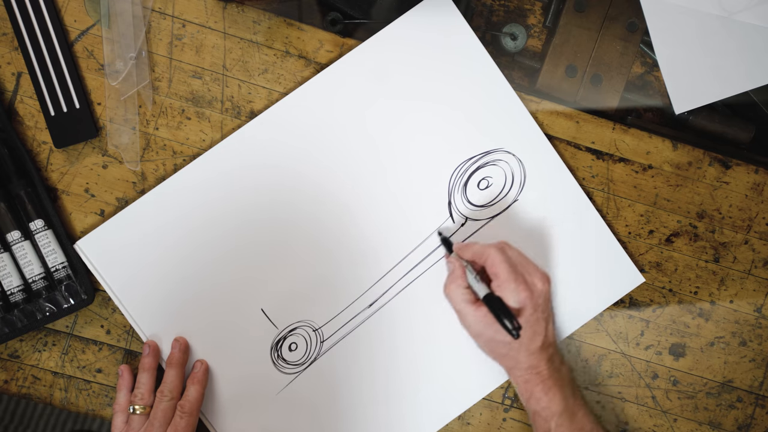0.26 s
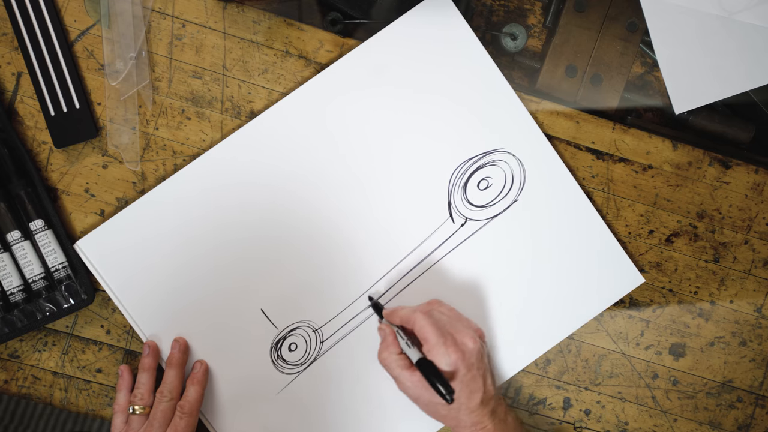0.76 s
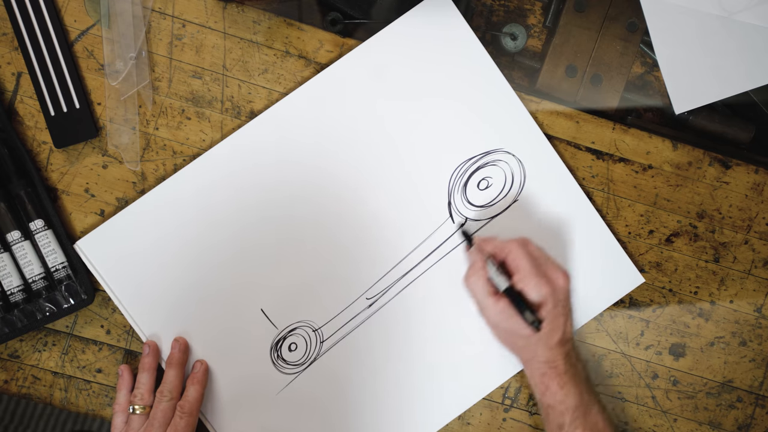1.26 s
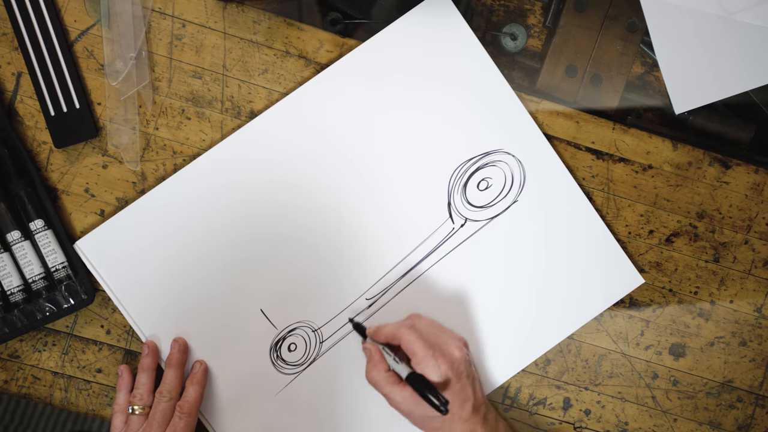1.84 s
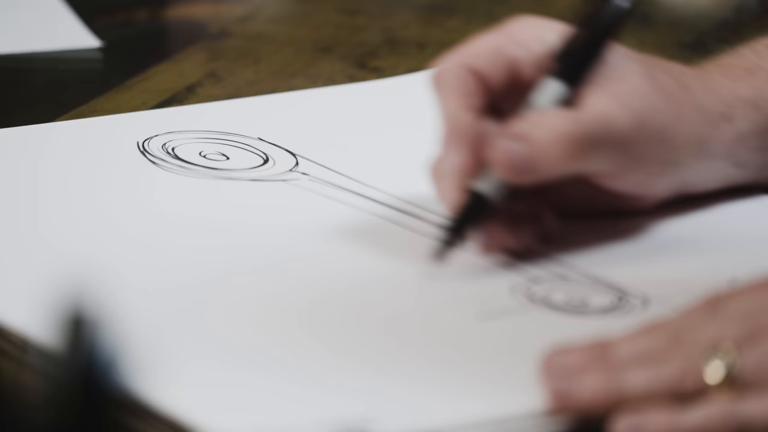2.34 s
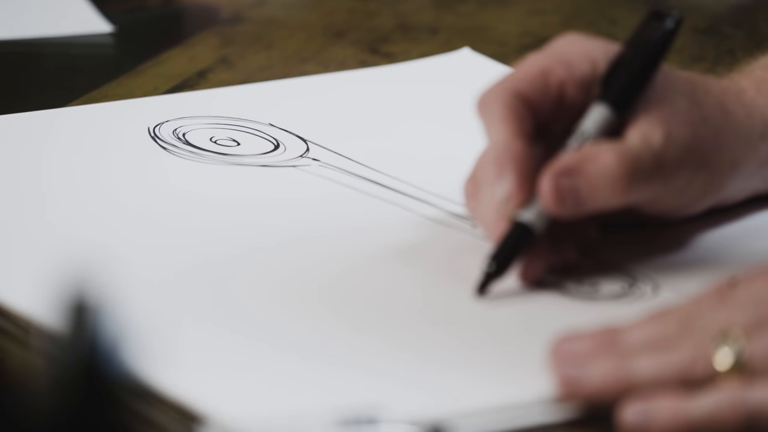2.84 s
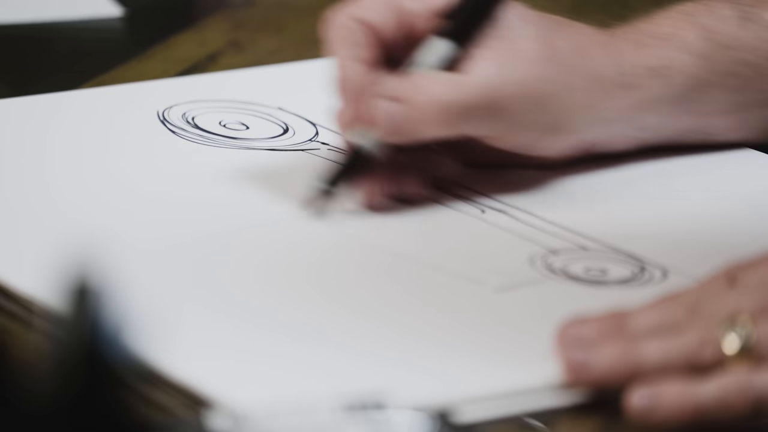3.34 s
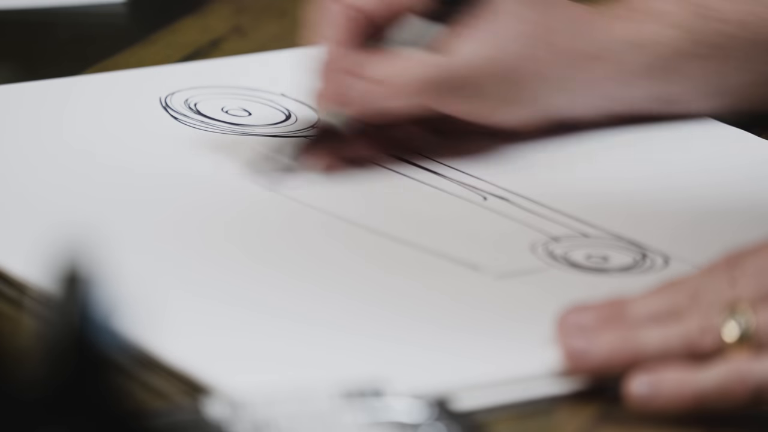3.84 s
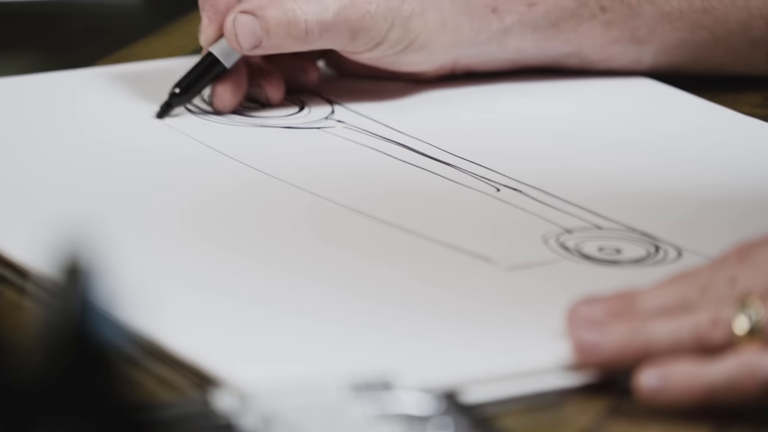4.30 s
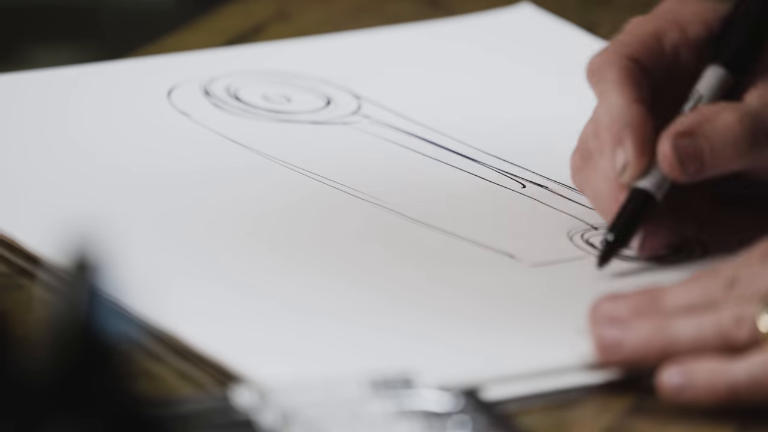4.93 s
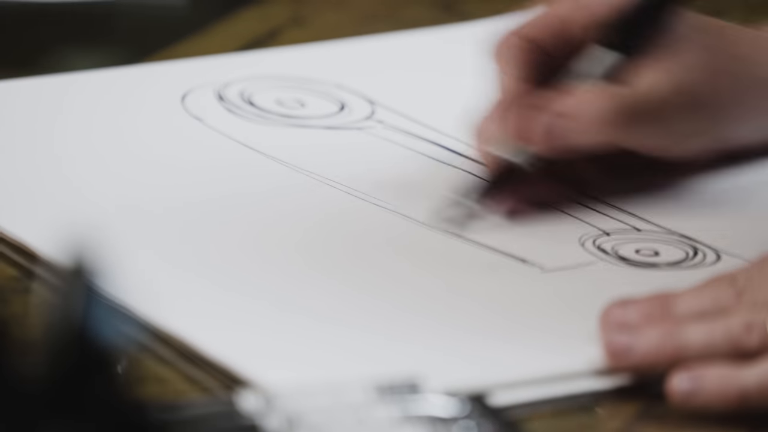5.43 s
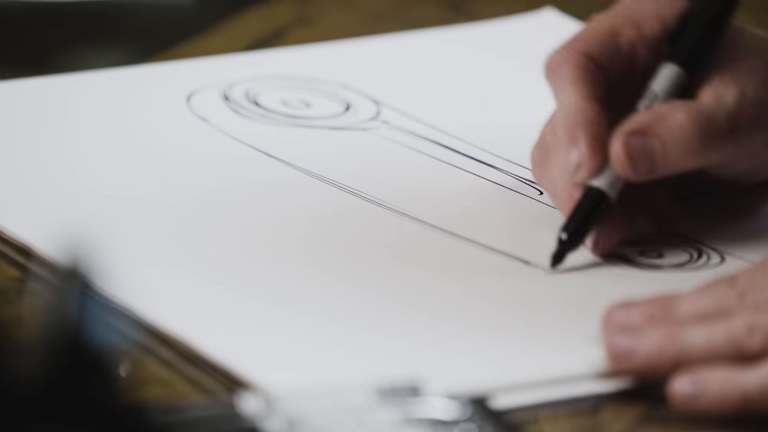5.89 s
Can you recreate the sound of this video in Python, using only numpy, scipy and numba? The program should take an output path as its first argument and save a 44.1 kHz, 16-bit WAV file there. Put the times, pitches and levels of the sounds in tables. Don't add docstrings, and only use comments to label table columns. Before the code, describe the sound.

Close, dry swishes of a felt marker sketching on a sheet, broken by pauses, faint taps and desk knocks in a quiet room.

```python
import sys
import numpy as np
from scipy import signal
from scipy.fft import rfft, irfft
from scipy.io import wavfile
from scipy.ndimage import uniform_filter1d, map_coordinates
from numba import njit

SR = 44100
rng = np.random.default_rng(int(sys.argv[2]) if len(sys.argv) > 2 else 0)


def boost(x):
    u = np.asarray(x, float) / 20
    return 10 ** u


def wrap_up_sound(samples):
    columns = np.atleast_2d(samples).T
    tamed = np.clip(columns, -1, 1)
    steps = np.round(tamed * 32767).astype(np.int16)
    wavfile.write(sys.argv[1], SR, steps)


N = 271435

# fastest_s, rise_s, fall_s, rustle_db, gap_minus_rustle_db
SWEEPS = [
    (0.105, 0.12, 0.11, -50, -9.5),
    (1.262, 0.11, 0.1, -50.5, -11.5),
    (1.876, 0.1, 0.092, -51, -9),
    (3.306, 0.12, 0.11, -49, -9.5),
    (4.001, 0.15, 0.11, -47.5, -5.5),
    (4.92, 0.1, 0.15, -51, -5.7),
    (5.621, 0.098, 0.13, -48.5, -4),
]
# fastest_s, rise_s, fall_s, rustle_db, gap_minus_rustle_db
SLIDES = [(0.334, 0.14, 0.11, -65, -5.5), (0.503, 0.093, 0.047, -79, -0.5), (0.683, 0.1, 0.087, -57, -10.5),
          (0.82, 0.357, 0.17, -82.4, -1), (1.459, 0.096, 0.086, -67.5, -4.5),
          (1.59, 0.058, 0.23, -83.4, -3), (2.138, 0.17, 0.083, -71, -6), (2.307, 0.096, 0.12, -63.5, -10.5),
          (2.494, 0.15, 0.095, -63.5, -6.5), (2.614, 0.057, 0.13, -69.8, -3.5),
          (2.755, 0.053, 0.106, -71.5, -4), (3.493, 0.089, 0.17, -58, -8), (4.128, 0.04, 0.2, -73, -2),
          (4.28, 0.1, 0.086, -67.5, -6.5), (4.562, 0.162, 0.1, -62, -6.5), (5.165, 0.094, 0.13, -58, -4.5),
          (5.33, 0.078, 0.15, -60.9, -6.5), (5.805, 0.072, 0.24, -56, -8.7),
          (5.954, 0.15, 0.096, -59.5, -9.5)]
# fastest_s, rise_s, fall_s, rustle_db, gap_minus_rustle_db
DRAGS = [
    (4.69, .03, .1, -65, -4),
    (1.14, .035, .06, -84, 14),
    (5.425, .04, .03, -68, -6),
    (6.15, .05, .05, -81, 4),
    (2.97, .1, .15, -86, 4),
]
# hardest_s, rise_s, fall_s, fibre_ring_db, hiss_minus_ring_db
PRESSES = [(0.008, 0.033, 0.087, -45.1, 4), (0.06, 0.043, 0.081, -46.5, 3), (0.673, 0.077, 0.07, -64, 7.5),
           (1.194, 0.032, 0.067, -42.5, 3), (1.811, 0.042, 0.1, -45.5, 3.5),
           (3.23, 0.044, 0.07, -46.5, -1.4), (3.865, 0.036, 0.13, -43.6, 0.5),
           (3.968, 0.05, 0.068, -69, 9.0), (4.541, 0.12, 0.072, -54.5, 2), (4.783, 0.093, 0.15, -45.5, 0.2),
           (4.84, 0.015, 0.19, -60.5, 8), (5.526, 0.063, 0.04, -44.5, -0.5),
           (5.571, 0.09, 0.129, -48.2, 3.0), (6.134, 0.039, 0.224, -76, -6)]
TURNS_S = [1.745, 2.215, 2.57, 3.418, 3.8, 4.648, 5.078, 5.265, 5.448, 5.745]
TURNS_DB = [3.6, 4, 3.6, 3.2, 3, 5.5, 5, 5, 11, 3.8]
SHEET_MODES_HZ = [1010, 1250, 1725]
SHEET_MODES_WIDTH_HZ = [180, 170, 130]
SHEET_MODES_DB = [-3.5, -2, -1]
# start_s, peak_db, ring_hz, low_modes_db, high_modes_db
KNOCKS = [(0.311, -46.5, 684, 0.5, 2.5), (.79, -62.5, 520, -8, 1), (1.994, -55.5, 764, -12, -8),
          (2.33, -61.5, 380, -1, -12), (3.773, -56.5, 426, -4, -1), (4.676, -45.5, 773, -16, -15),
          (5.258, -59.5, 727, -7, -12), (4.768, -51.5, 363, -13, -13), (5.842, -42, 682, -11, -13),
          (5.853, -46.5, 395, 3, -4), (5.876, -54, 414, 4, -10)]
# pitch_hz, level_db, t60_s
DESK_LOW = [(380, -5, 0.075), (271, -8, 0.027), (520, -4, 0.025)]
# pitch_hz, level_db, t60_s
DESK_HIGH = [(944, -7, 0.039), (1555, 3.5, 0.024), (1710, -11, 0.081), (2550, -11, 0.0156)]
TICKS_S = [1.66, 1.70, 2.595, 2.6094, 2.6494, 2.682, 2.9008, 3.0799, 3.1248, 3.7735, 4.6738]
# peak_db, ring_hz
TICK_SOUNDS = [(-61, 9000), (-64, 9000), (-54, 12700), (-56, 3800), (-58, 5580), (-55, 1600), (-66, 7000),
               (-62, 10700), (-53.5, 6570), (-59, 1900), (-54, 5000)]
# loudest_s, rise_s, fall_s, level_db
SHIFTS = [(2.95, 0.11, .2, -70.5), (0.785, .06, 0.15, -70.5), (.03, 0.11, 0.4, -69.5),
          (5.55, .25, 0.29, -71), (1.22, 0.06, 0.13, -72), (4.8, 0.47, 0.37, -75.5),
          (1.85, 0.056, .15, -70)]
# loudest_s, rise_s, fall_s, level_db
DUCT_SWELLS = [(.85, .5, 0.35, -76), (1.85, 0.27, 0.13, -75), (2.75, 0.43, 0.36, -68.5),
               (3.25, 0.11, 0.67, -68.5), (4.3, 0.47, 0.26, -68.5), (5.1, 0.19, 0.18, -69),
               (5.4, 0.16, .15, -69), (5.92, 0.6, 0.2, -68)]
# centre_s, pitch_hz, level_db, length_s
BUMPS = [
    (4.33, 35, -68, 0.23),
    (4.864, 140, -63, 0.096),
    (5.73, 31, -62.5, 0.22),
]
# pitch_hz, density_db (per Hz)
AIR = [(200, -20.5), (360, 1), (500, -3.5), (680, 2), (880, -4), (1150, -9), (2000, -12.5), (3300, -16),
       (5500, -16.5), (9000, -19), (15700, -20)]

HAND_BENDS, TIP_BENDS = (2.3, 2.02), (3.12, 2.53)


def level(x, db=0.):
    return x * boost(db) / np.sqrt(np.mean(x ** 2))


def band(x, lo_hz, hi_hz, order=2):
    return signal.sosfilt(signal.butter(order, [lo_hz, min(hi_hz, .45 * SR)], "band", fs=SR, output="sos"), x)


@njit
def resonance(x, hz, width_hz):
    y, band_state, low_state = np.empty(len(x)), 0., 0.
    for i in range(len(x)):
        g, k = np.tan(np.pi * hz[i] / SR), width_hz / hz[i]
        v = (band_state + g * (x[i] - low_state)) / (1 + g * (g + k))
        band_state, low_state = 2 * v - band_state, low_state + 2 * g * v
        y[i] = k * v
    return y


def walk(rate_hz):
    hold = int(SR / rate_hz)
    steps = np.repeat(rng.standard_normal(N // hold + 1), hold)
    return 1.18 * uniform_filter1d(uniform_filter1d(steps, hold), hold)[:N]


def ring(t, hz, t60_s):
    return np.sin(2 * np.pi * hz * t) * 1000. ** (-t / t60_s)


def add(out, start_s, sound):
    i = int(start_s * SR)
    out[i:i + len(sound)] += sound[:N - i]


def swells(rows, bends):
    peak_s, rise_s, fall_s = np.array(rows).T[:3, :, None]
    since_s = np.arange(0, N, 64) / SR - peak_s
    rising = abs(since_s / rise_s) ** bends[0]
    falling = abs(since_s / fall_s) ** bends[1]
    return -20 * np.where(since_s < 0, rising, falling), since_s


def every_sample(x):
    return np.interp(np.arange(N), np.arange(0, N, 64), x)


def total(db):
    return every_sample(np.sqrt(np.sum(boost(2 * db), axis=0)))


def swelling(rows):
    return total(np.array(rows).T[3][:, None] + swells(rows, HAND_BENDS)[0])


def motion():
    moves, fast = SWEEPS + SLIDES + DRAGS, slice(len(SWEEPS))
    speed_db, along_s = swells(moves, HAND_BENDS)
    hand_db, gap_db = np.array(moves).T[3:, :, None]
    press_db, since_s = swells(PRESSES, TIP_BENDS)
    tip_db, upper_db = np.array(PRESSES).T[3:, :, None]
    hand, tip = total(hand_db + speed_db), total(tip_db + press_db)
    hiss = total(tip_db + press_db + upper_db + 44 * np.clip(since_s, -.1, .2))
    valley = total(hand_db - 1 + 0.73 * gap_db + 0.8 * speed_db)
    valley = np.roll(valley, int(0.0063 * SR))
    climb_s = every_sample(np.sum((np.clip(along_s, -.1, .1) * boost(0.27 * speed_db))[fast], axis=0))
    whoop = total((hand_db + gap_db + 1.5 + 8.2 * speed_db)[fast])
    boom = total((hand_db + 5 + 1.77 * gap_db + 2.5 * speed_db)[fast])
    whoop, boom = np.roll([whoop, boom], int(0.0036 * SR), axis=1)
    gap = np.hypot(total(hand_db + gap_db + 0.77 * speed_db), whoop)
    return dict(ring=np.hypot(tip, boost(-2.5) * hand), hiss=hiss, skin=boost(-0.5) * hand,
                rustle=hand, tooth=boost(-11.5) * tip, boom=boom, climb=climb_s,
                valley=np.hypot(valley, boost(-26.5) * tip), gap=np.hypot(gap, boost(-27) * tip))


def catches(per_s, scatter_db, smooth, patchy_db):
    size = boost(scatter_db * np.minimum(rng.exponential(size=N), 5))
    slips = (rng.random(N) < per_s / SR) * size * rng.choice([-1, 1], N)
    return (level(slips) + smooth * rng.standard_normal(N)) * boost(patchy_db * walk(250))


def nib(gain):
    rub = catches(per_s=4200, scatter_db=1.5, smooth=0.88, patchy_db=0.5)
    light_rub = catches(per_s=5000, scatter_db=-2.5, smooth=0.93, patchy_db=-0.5)
    fibres = level(band(rub, 8140, 11550, order=3) + .5 * band(rub, 10250, 10260, order=1))
    hiss = level(band(light_rub, 11520, 14850, order=3))
    skin = level(band(rub, 12850, 18000, order=3))
    return gain["ring"] * fibres + gain["hiss"] * hiss + gain["skin"] * skin


def hand_echo(x):
    lag = SR * (0.000469 + .00009 * walk(5.6))
    return x + .14 * map_coordinates(x, [np.arange(N) - lag], order=3)


def sheet(gain):
    gap_hz = 1368 + 43 * np.arange(N) / SR + 3500 * gain["climb"]
    gap_hz = gap_hz * (1 + 0.082 * walk(7))
    slowness_db = np.clip(-20 * np.log10(gain["rustle"] + 1e-9) - 50, 0, 20)
    rustle_hz = (5650 - 46 * slowness_db) * (1 + 0.013 * walk(4))
    rub = catches(per_s=3500, scatter_db=1.5, smooth=1.34, patchy_db=1.15)
    scrape = catches(per_s=3500, scatter_db=0.5, smooth=0.81, patchy_db=0.5)
    free_paper = level(resonance(rng.standard_normal(N), rustle_hz, 1100.0))
    rustle = level(level(band(rub, 4380, 7170)) + 0.6 * free_paper)
    valley = level(band(scrape, 1940, 4040))
    hum = level(resonance(resonance(rub, gap_hz, 650.), gap_hz, 650.))
    gap = level(1.17 * hum + level(band(rub, 1056, 2114, order=4)))
    desk = level(band(rng.standard_normal(N), 273, 1050), -15.5)
    modes = zip(SHEET_MODES_HZ, SHEET_MODES_WIDTH_HZ, SHEET_MODES_DB)
    boom = level(sum(boost(db) * level(band(scrape, hz - width / 2, hz + width / 2)) for hz, width, db in modes))
    patch = level(resonance(rng.standard_normal(N), 4050 * (1 + 0.037 * walk(12)), 450.))
    tooth = level(level(band(scrape, 6200, 7950)) + .5 * level(band(rub, 3270, 6300))
                  + 0.2 * level(band(scrape, 1250, 3400)) + .4 * patch)
    return (gain["rustle"] * rustle + gain["valley"] * valley + gain["gap"] * (gap + desk)
            + gain["boom"] * boom + gain["tooth"] * tooth)


def halts():
    t, half_s = np.arange(N) / SR, 0.0099
    return boost(-sum(db * np.exp(-((t - s) / half_s) ** 2) for s, db in zip(TURNS_S, TURNS_DB)))


def knocks():
    out, t = np.zeros(N), np.arange(SR // 4) / SR
    cracks = rng.standard_normal((len(KNOCKS), len(t)))
    for (start_s, peak_db, ring_hz, low_db, high_db), crack in zip(KNOCKS, cracks):
        body = ring(t, ring_hz, 0.077) + 0.3 * ring(t, ring_hz * .97, 0.25)
        body += sum(boost(low_db + db) * ring(t, hz, t60_s) for hz, db, t60_s in DESK_LOW)
        body += sum(boost(high_db + db) * ring(t, hz, t60_s) for hz, db, t60_s in DESK_HIGH)
        body += boost(-4) * level(band(crack, 300, 3700, order=1)) * np.exp(-t / 0.0076)
        body += boost(-9) * level(band(crack[::-1], ring_hz * 0.54, ring_hz * 1.84)) * np.exp(-t / 0.053)
        push = 1 - np.exp(-t / 0.0015)
        add(out, start_s - .0015, boost(peak_db - 4.5) * body * push)
    return out


def ticks():
    out, t = np.zeros(N), np.arange(SR // 50) / SR
    cracks = rng.standard_normal((len(TICKS_S), len(t)))
    for start_s, (peak_db, ring_hz), crack in zip(TICKS_S, TICK_SOUNDS, cracks):
        snap = level(band(crack, ring_hz * 0.36, ring_hz * 1.4, order=1)) * np.exp(-t / .0012)
        add(out, start_s, boost(peak_db - 4.5) * (.7 * ring(t, ring_hz, 0.018) + 0.87 * snap))
    return out


def forearm():
    return swelling(SHIFTS) * level(band(rng.standard_normal(N), 162, 433))


def room(x):
    t, t60_s = np.arange(SR // 2) / SR, 0.19
    tail = band(rng.standard_normal(len(t)), 150, 7000, order=1) * 1000. ** (-t / t60_s) * (t > .006)
    return signal.fftconvolve(x, tail / np.sqrt(np.sum(tail ** 2)))[:N] * boost(-16)


def studio(gain):
    t = np.arange(N) / SR
    f = np.maximum(np.fft.rfftfreq(N, 1 / SR), 1)
    hz, db = np.transpose(AIR)
    air_shape = boost(np.interp(np.log(f), np.log(hz), db))
    air = level(irfft(rfft(rng.standard_normal(N)) * air_shape, N), -74)
    noise = rng.standard_normal((4, N))
    duct_hz, duct_width_hz = 83.3, 15.8
    duct = level(band(noise[0], duct_hz - duct_width_hz / 2, duct_hz + duct_width_hz / 2))
    duct = duct * np.hypot(boost(-71.5 + 2.5 * walk(2.94)), swelling(DUCT_SWELLS))
    rumble = level(band(noise[1], 121, 332) + .5 * band(noise[1], 180, 200, order=1))
    rumble = rumble * np.hypot(boost(-77 + 2.1 * walk(3.7)), boost(-15.5) * gain["boom"])
    steady = level(band(noise[2], 24, 55), -77) + level(band(noise[3], 108.0, 139.7), -76.5)
    bumps = sum(boost(db) * np.sin(2 * np.pi * hz * t) * np.exp(-((t - centre_s) / length_s * 2) ** 2)
                for centre_s, hz, db, length_s in BUMPS)
    return air * boost(0.14 * walk(2.02)) + duct + rumble + steady + bumps


def scene():
    gain = motion()
    friction = halts() * (hand_echo(nib(gain)) + sheet(gain))
    near = friction + knocks() + ticks() + forearm()
    mono = near + room(near) + studio(gain)
    return np.array([mono, mono])


def low_pass(x):
    return signal.sosfilt(signal.butter(12, 16660, fs=SR, output="sos"), x)


def record(dry):
    mix = signal.sosfilt(signal.ellip(12, .3, 75, 15830, fs=SR, output="sos"), dry)
    return low_pass(mix)


dry = scene()
out = record(dry)
wrap_up_sound(out)
```